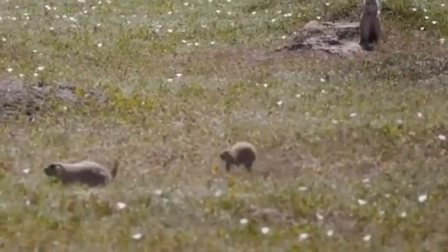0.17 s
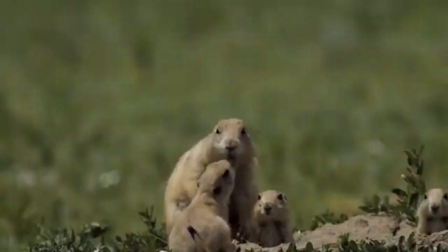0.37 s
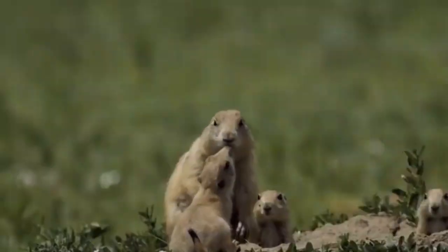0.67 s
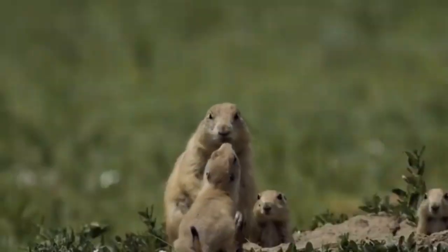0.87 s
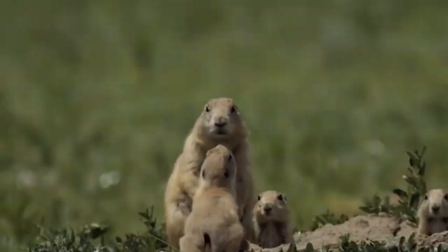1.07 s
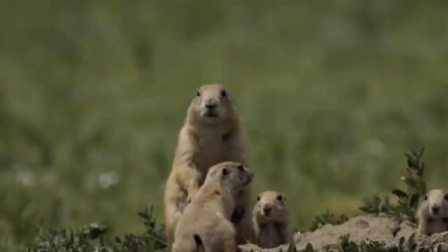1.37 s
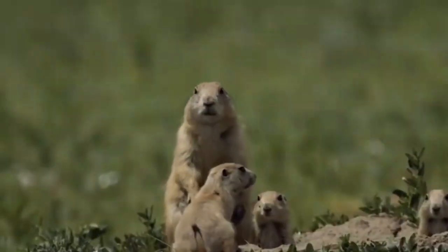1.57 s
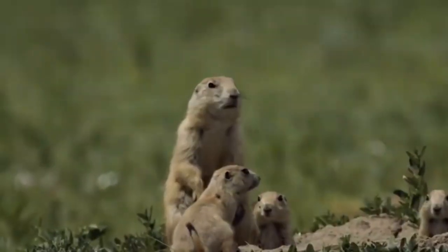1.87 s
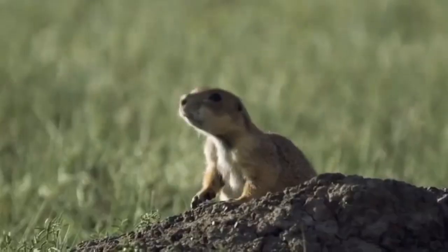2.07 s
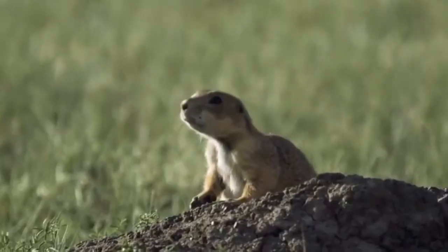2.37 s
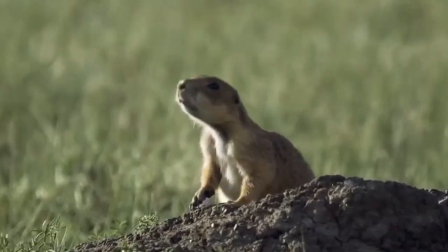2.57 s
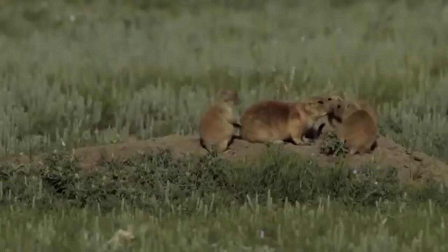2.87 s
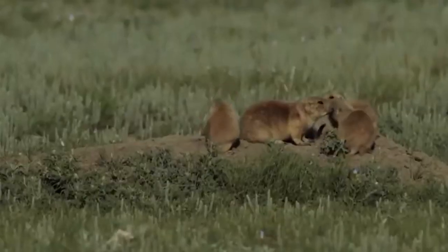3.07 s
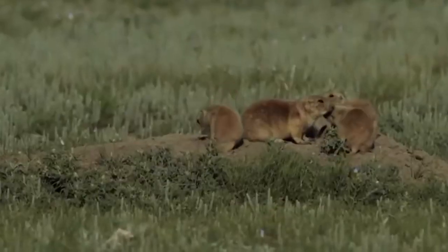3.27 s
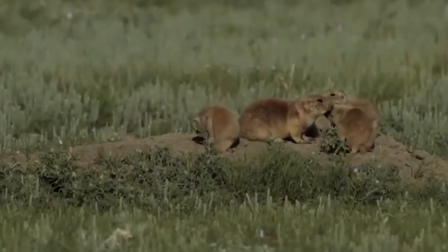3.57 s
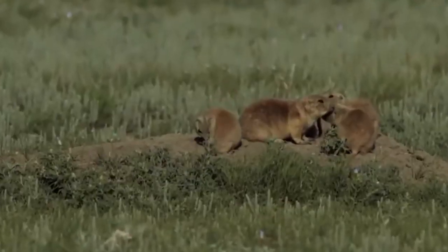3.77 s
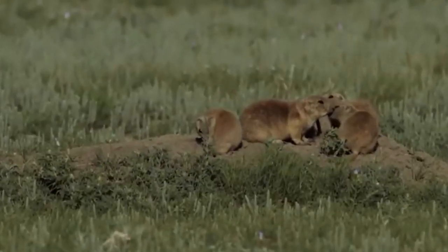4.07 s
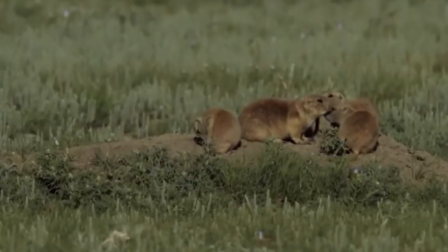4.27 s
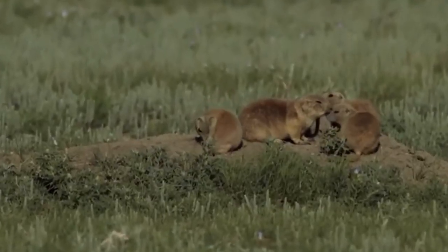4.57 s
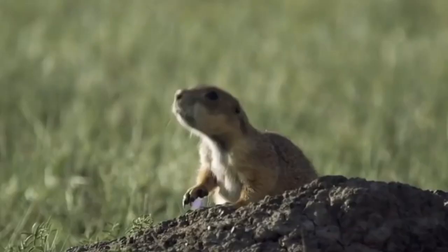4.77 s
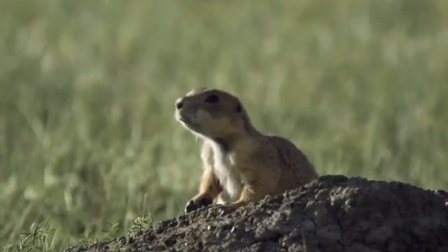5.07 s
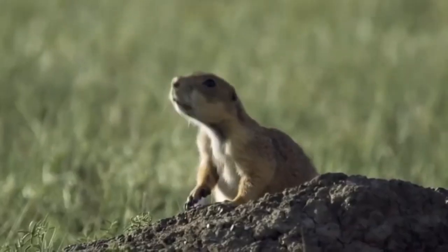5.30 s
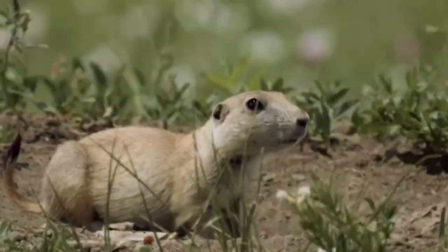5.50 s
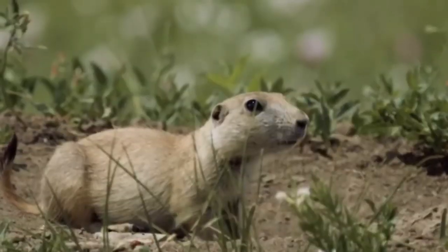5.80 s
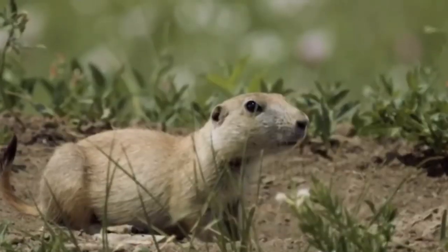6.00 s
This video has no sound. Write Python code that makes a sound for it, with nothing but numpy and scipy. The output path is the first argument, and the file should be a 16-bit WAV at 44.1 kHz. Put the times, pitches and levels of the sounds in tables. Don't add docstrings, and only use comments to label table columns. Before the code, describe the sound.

Sharp high yips from a small rodent, close and crisp, about thirteen loud ones after a single far-off one. They begin strong, shrink to two extremely clipped chirps midway, then return as a steadier, somewhat softer series. Every yip has a hard snap, a whistly buzzing tone and a brief echoing tail. Soft mouth clicks and breathy puffs fill the gaps, with low air noise and slight hiss constantly beneath.

```python
import sys
import numpy as np
from scipy import signal
from scipy.fft import rfft, irfft, next_fast_len
from scipy.io import wavfile
from scipy.ndimage import uniform_filter1d

SR = 44100
rng = np.random.default_rng(int(sys.argv[2]) if len(sys.argv) > 2 else 0)


def unload_audio(sound):
    columns = np.transpose(np.atleast_2d(sound))
    steps = np.round(np.clip(columns, -1, 1) * 32767)
    wavfile.write(sys.argv[1], SR, steps.astype(np.int16))


def boost(x):
    u = np.asarray(x, float) / 20
    return 10 ** u


N = 270774


def evened(x):
    return x / np.sqrt(np.mean(x ** 2) + 1e-20)


def read(points, hz):
    f, value = np.transpose(points)
    return np.interp(np.log(hz + 1), np.log(f + 1), value)


def add(mix, s, sound):
    part = mix[round(s * SR):][:len(sound)]
    part += sound[:len(part)]


def wobble(n, span):
    return evened(uniform_filter1d(uniform_filter1d(rng.standard_normal(n), span), span))


def air():
    # (frequency [Hz], density [dB per Hz])
    air_colour = [(35, -70), (60, -36), (102, -31), (151, -10.5), (323, -5.5), (363, -7.5), (407, -7),
                  (759, -14), (935, -16.5), (1200, -15.5), (1350, -21), (1740, -19), (14900, -24)]
    air_db = -55.5
    drone_hz, drone_db, drone_end_s = 127, -68, 0.62

    hz, blocks = np.fft.rfftfreq(2048, 1 / SR), N // 512 + 6
    real, imaginary, patches = rng.standard_normal((blocks, len(hz), 3)).T
    patches = evened(uniform_filter1d(uniform_filter1d(patches, 14, 0), 6, 1))
    lumpy_db = np.interp(hz, [400, 2000], [2.2, .7])[:, None]
    z = (real + 1j * imaginary) * boost(read(air_colour, hz)[:, None] + lumpy_db * patches)
    noise = signal.istft(z, nperseg=2048, noverlap=1536)[1][:N]

    t = np.arange(N) / SR
    drone = boost(drone_db + 1.5 * wobble(N, span=1500)) * np.sin(2 * np.pi * drone_hz * t)
    drone *= np.clip((drone_end_s - t) / .05, 0, 1)
    return boost(air_db) * evened(noise) + drone


def space(x):
    # (frequency [Hz], decay by 60 dB [s], level [dB])
    ring = [(500, .2, 1), (1300, 0.46, -8), (2580, 0.44, 3), (3700, 0.5, -6), (6980, 0.33, -5.5),
            (11900, 0.18, 0.5)]
    taps = np.zeros(SR // 2)
    at = np.arange(200, SR // 2 - 20, 20)
    sign = rng.choice([-1., 1.], len(at))
    taps[at + rng.integers(0, 20, len(at))] = sign * boost(6.1 * rng.standard_normal(len(at)))
    hz, t, z = signal.stft(taps, SR, nperseg=256)
    wall_db = 5 * np.exp(-((t - .055) / .012) ** 2)
    t60, colour_db = (read([(row[0], row[k]) for row in ring], hz)[:, None] for k in (1, 2))
    tail = signal.istft(z * boost(colour_db + wall_db - 60 * t / t60), SR, nperseg=256)[1]
    return signal.fftconvolve(x, tail / np.linalg.norm(tail))[:N]


def resonate(x, hz, bandwidth):
    return signal.lfilter(*signal.iirpeak(min(hz, 20000), hz / bandwidth, SR), x)


def resonate_twice(x, hz, bandwidth):
    return resonate(resonate(x, hz, bandwidth), hz, bandwidth)


def throat(x, treble_db, widen, top_db=0):
    # (frequency [Hz], width [Hz], level [dB])
    resonances = [(1320, 300, -12), (3050, 380, -5), (3830, 330, 0), (5500, 600, -13), (7000, 700, -9),
                  (10900, 2600, -12), (14800, 800, -22)]
    total = 0
    for hz, bandwidth, db in resonances:
        lift_db = treble_db * (hz > 5000) + top_db * (hz > 9000)
        total = total + boost(db + lift_db) * resonate_twice(x, hz, bandwidth * widen)
    return total


def pop(db, hz, click_db, length, wet, tooth_hz=0):
    t = np.arange(1500) / SR
    specks = rng.standard_normal(len(t)) * (rng.random(len(t)) < .08)
    spit = specks * np.sin(np.pi * np.minimum(t / length, 1)) ** .5
    smack = 3 * (t == 0)
    cavity = resonate_twice((1 - wet) * smack + wet * spit, hz, 0.44 * hz)
    click = throat(rng.standard_normal(len(t)) * np.exp(-t / 0.00091), -11.5, 7.0)
    if tooth_hz:
        click = resonate_twice(click, tooth_hz, 900) + 0.18 * click
    return boost(db) * (cavity / abs(cavity).max() + boost(click_db) * click / abs(click).max())


def mouth_noises():
    # (time [s], peak [dB], pitch [Hz], click [dB])
    pops = [(0.747, -31, 1140, -11), (1.075, -35.5, 1030, -16), (1.19, -42, 620, -16),
            (1.561, -52, 970, -15), (1.857, -35, 1125, -16), (2.162, -31.5, 1100, -16),
            (2.229, -43.5, 1057, -17), (2.341, -43, 999.6, -10), (2.474, -30, 1040, -14),
            (2.706, -59, 520, -16), (3.052, -52, 1110, -9), (3.303, -44.5, 1110, -6),
            (3.378, -31, 1010, -1.5), (3.618, -42, 1120, -9.5), (4.568, -38, 1020, -14),
            (4.633, -38, 1040, -14), (4.888, -35.5, 1020, -12), (5.213, -32.5, 1090, -16),
            (5.285, -47, 1119, -15), (5.672, -33, 1000, -1.5), (6.033, -46, 1006, -16),
            (6.103, -48.5, 590, -16)]
    # (time [s], peak [dB], pitch [Hz], length [s])
    gurgles = [
        (1.17, -40, 761.1, .014),
        (1.5327, -31.5, 790, 0.0075),
        (4.229, -36, 1010, 0.013),
        (4.951, -35, 616, .016),
        (4.963, -34.5, 1060, 0.016),
        (5.725, -38.5, 1154, .012),
        (5.737, -29, 915, 0.012),
    ]
    # (time [s], peak [dB], pitch [Hz], click [dB], tooth ring [Hz], 0 for none)
    ticks = [
        (1.5113, -25.5, 1006, -6.5, 3050),
        (4.0956, -41.5, 1188, 16, 0),
    ]
    mix = np.zeros(N)
    for s, *rest in pops:
        add(mix, s, pop(*rest, length=.0055, wet=.6))
    for s, db, hz, length in gurgles:
        add(mix, s, pop(db, hz, click_db=-29, length=length, wet=.66))
    for s, *rest, tooth_hz in ticks:
        add(mix, s, pop(*rest, length=.0034, wet=0.33, tooth_hz=tooth_hz))
    return mix


def wheeze(length, db, treble_db):
    n = round(length * SR)
    breath = evened(throat(rng.standard_normal(n), treble_db, 1.0))
    return boost(db + 2.3 * wobble(n, span=90)) * breath * signal.windows.tukey(n, .6)


def wheezes():
    # (start [s], length [s], level [dB], treble [dB])
    breaths = [
        (.505, 0.022, -57, -14),
        (1.439, 0.067, -48.5, -2),
        (1.795, 0.014, -42.5, -9),
        (2.725, 0.045, -57, -8),
        (2.749, 0.037, -48, -1),
        (2.829, .01, -59.5, -6.5),
        (3.05, 0.074, -44.5, -7),
        (4.105, 0.014, -49, -9.5),
        (5.62, .02, -56, 3),
    ]
    mix = np.zeros(N)
    for s, *rest in breaths:
        add(mix, s, wheeze(*rest))
    return mix


def low_harmonics(voice, flutter, depth_db, mouth_db, low_db):
    third_db = 10 * np.log10((1 - boost(2 * depth_db)) / (1 + boost(2 * mouth_db)))
    tone = boost(low_db) * np.sin(voice) * (1 + 2 * boost(.5 * depth_db - 14.0) * np.cos(flutter))
    tone += boost(third_db + mouth_db) * (np.cos(2 * voice - .8) + boost(-23.5) * np.cos(2 * voice - flutter))
    tone += boost(depth_db) * np.cos(2 * voice + flutter - 1)
    tone += boost(depth_db - 19.5) * np.cos(2 * voice + 2 * flutter)
    split = 1 + 2 * boost(1.12 * depth_db - 6) * np.cos(flutter) + 2 * boost(-44) * np.cos(2 * flutter)
    return tone + boost(third_db) * np.cos(3 * voice) * split


def high_harmonics(voice, flutter, hz, flutter_hz, depth_db, bright_db, top_db):
    # (frequency [Hz], level [dB])
    head = [(4700, 3.5), (5150, -9), (5700, 1), (6300, 8), (6800, -0.5), (7700, -3.5), (8500, -12.5),
            (9800, -8), (10900, -20), (11900, -30), (12900, -31), (13800, -31), (14800, -31), (16300, -19)]
    tone = np.zeros(len(voice))
    for k in range(4, 12):
        for m in range(-2, 3):
            side_db = abs(m) * (.4 * depth_db - 1)
            head_db = bright_db + top_db * (k > 6) + read(head, k * hz + m * flutter_hz) + side_db
            head_db += 3 * wobble(len(voice), span=120)
            tone += boost(head_db) * np.cos(k * voice + m * flutter + 1.9 * rng.standard_normal())
    return tone


def glottal_snap(n, at, hz, top_db):
    kick = 1. * (np.arange(n) == at)
    snap = throat(kick, 3, 3, top_db - 20) + .3 * resonate(kick, hz, 700) - .006 * resonate(kick, 60, 90)
    snap = np.roll(snap, at - np.argmax(snap))
    return snap / snap.max()


def bark(snap_s, length, peak_db, mean_hz, fade_db,
         snap_db, flutter_hz, mean_depth_db, lead_db, top_db, low_db, bright_db):
    # (share of length [0-1], pitch [%], flutter depth [dB], mouth [dB])
    course = [(0, 0.46, -1, -3.5), (.25, -1.82, -4, -6.5), (.5, -0.17, -1.5, 0), (.75, 3, 6.5, 9),
              (1, -2.23, 4, 6)]
    t = np.arange(snap_s - .022, snap_s + length + .02, 1 / SR)
    n = len(t)
    before_s = np.minimum(t - snap_s, 0)
    done = np.clip((t - snap_s) / length, 0, 1)
    share, *bends = np.transpose(course)
    bend, deeper_db, wider_db = (np.interp(done, share, c) for c in bends)

    effort_db = peak_db - fade_db * done ** 1.37 + 0.9 * wobble(n, span=150)
    hz = mean_hz * (1 + bend / 100)
    depth_db = np.minimum(mean_depth_db + deeper_db, -1)
    mouth_db = -6.5 + 0.1656 * (mean_hz - 1359.2) + wider_db
    low_db = low_db - peak_db
    bright_db = bright_db + .3 * top_db - peak_db
    lead_db = lead_db - peak_db

    voice = 2 * np.pi * np.cumsum(hz * (1 + .005 * wobble(n, span=60))) / SR
    flutter = 2 * np.pi * np.cumsum(flutter_hz * (1 + 0.097 * wobble(n, span=100))) / SR
    at = round((snap_s - t[0]) * SR) + 9
    voice, flutter = voice - voice[at], flutter - flutter[at]

    fundamental_db = low_db - 0.5 * (effort_db - peak_db)
    tone = low_harmonics(voice, flutter, depth_db, mouth_db, fundamental_db)
    tone += high_harmonics(voice, flutter, hz, flutter_hz, depth_db, bright_db, top_db)
    tone += boost(-21 + 1.41 * mean_depth_db) * (np.cos(flutter) + 0.84 * np.cos(2 * flutter))
    rasp = boost(-13) * evened(throat(rng.standard_normal(n), 1.0, 1.595, top_db - 3.5))

    gate = boost(before_s * 16000 - 60 * np.maximum(t - snap_s - length, 0) / .010)
    gate = np.maximum(gate, boost(lead_db + 9 + before_s * 4200) * (t < snap_s))
    lead = boost(lead_db - 3.5 + before_s * 1000) * (t < snap_s)
    air_in = rng.standard_normal(n)
    hiss = 1.4 * evened(throat(air_in, -1.6, 1.5, top_db - 6.0))
    hiss += 0.71 * evened(resonate(air_in, 2935, 127)) + 0.4 * np.cos(voice)

    sound = boost(effort_db) * (gate * (np.sqrt(2) * tone + rasp) + lead * hiss)
    sound += boost(snap_db - 5) * glottal_snap(n, at, hz[at], top_db)
    return t[0], sound - .95 * resonate(sound, 8650, 1000)


def barks():
    # (snap time [s], length [s], effort [dB], pitch [Hz], fade [dB])
    efforts = [(0.5179, 0.025, -45, 1300, -1.5), (0.7111, .030, -13.2, 1308, 5),
               (1.0511, .025, -13.5, 1280, 9.5), (1.8106, 0.035, -13.5, 1361, 7),
               (2.1231, 0.0288, -14, 1369, 7), (2.4444, .026, -14.5, 1327, 8),
               (3.094, .011, -16.5, 1430, 18.5), (3.3600, 0.011, -15.5, 1280, 17.5),
               (4.131, 0.0346, -19, 1386, 15), (4.523, .034, -18, 1396, 6), (4.85, 0.0296, -16.5, 1370, 7),
               (5.1757, 0.0302, -16, 1375, 11), (5.6473, .0160, -20, 1345, 5),
               (5.9907, 0.017, -19.5, 1423, 7.5)]
    # (snap [dB], flutter [Hz], flutter depth [dB], lead-in air [dB], top treble [dB])
    colours = [(-44, 235, -12, -65.5, -9.5), (-4.5, 262, -21.5, -34.5, 0.5), (-9, 248, -19, -36.5, 0.5),
               (-6, 290, -10.5, -32, -3), (-1.5, 278, -12, -33.5, -1), (-5, 283, -11.5, -31, -3.5),
               (-22, 291, -3.5, -32.5, -3), (-15, 249, -13, -32.5, -14), (-23, 300, -7.5, -35.5, -2),
               (-5, 302, -7, -36, -4), (-5.5, 269.5, -8.5, -37, -3), (-9, 275, -9, -38.5, -3.5),
               (-27, 291, -11, -33, -8), (-25, 266, -16, -35.5, -3)]
    dry, wet = np.zeros(N), np.zeros(N)
    for i, (effort, colour) in enumerate(zip(efforts, colours)):
        far = i == 0
        low_db, bright_db = (-67, -73) if far else (-27.5, -31.5)
        s, sound = bark(*effort, *colour, low_db, bright_db)
        echo_db = -17.5 + 218.5 * effort[1] + 11.5 * far
        add(dry, s, sound)
        add(wet, s, boost(echo_db) * sound)
    return dry, wet


def scene():
    dry, wet = barks()
    small = wheezes() + mouth_noises()
    return (dry + small + space(wet + boost(-13) * small) + air())[None]


def masked(x, margin_db, slope_db):
    hz, _, z = signal.stft(x, SR, nperseg=1024, noverlap=768)
    power = uniform_filter1d(uniform_filter1d(abs(z) ** 2, 5, 0), 3, 1)
    band_db = 10 * np.log10(power + 1e-16)
    fall = slope_db * hz[:, None] / 1000
    mask_db = np.maximum.accumulate(band_db + fall, 0) - fall - margin_db
    quiet = band_db < np.median(band_db, 1, keepdims=True) + 12
    hidden = (band_db < mask_db) & quiet & (hz[:, None] > 4300)
    lost = uniform_filter1d(1. * hidden, 5, 1) > .5
    return signal.istft(z * np.where(lost, boost(-22), 1), SR, nperseg=1024, noverlap=768)[1][:N]


def band_limited(x):
    # (frequency [Hz], level [dB])
    treble_edge = [(14950, 0), (15150, -22), (16300, -30), (16500, -70)]
    size = next_fast_len(N)
    gain = boost(read(treble_edge, np.fft.rfftfreq(size, 1 / SR)))
    return irfft(rfft(x, size) * gain, size)[:, :N]


def band_limit(x):
    return signal.sosfilt(signal.butter(12, 16340, fs=SR, output="sos"), x)


def record(dry):
    thinned = masked(dry[0], margin_db=21.5, slope_db=10.5)[None]
    finished = band_limited(thinned)
    return band_limit(finished)


dry = scene()
out = record(dry)
unload_audio(out)
```